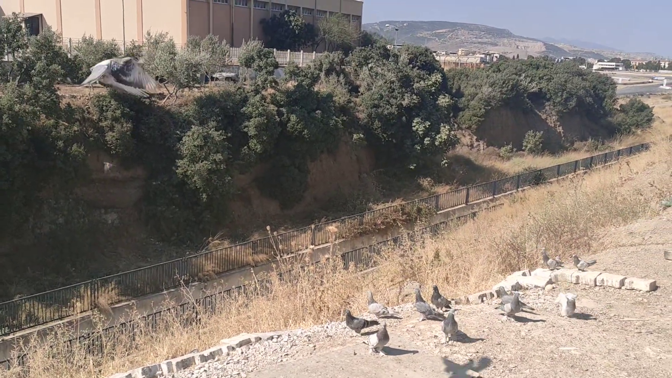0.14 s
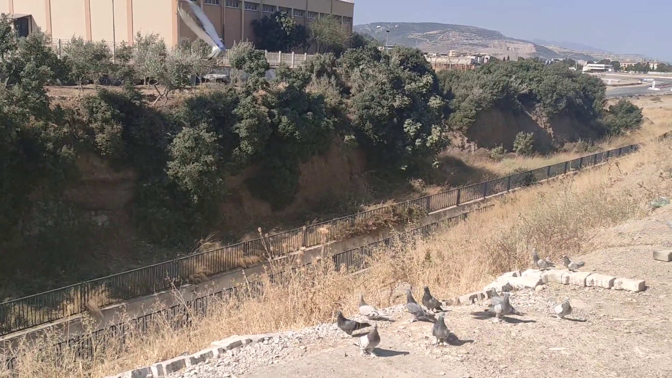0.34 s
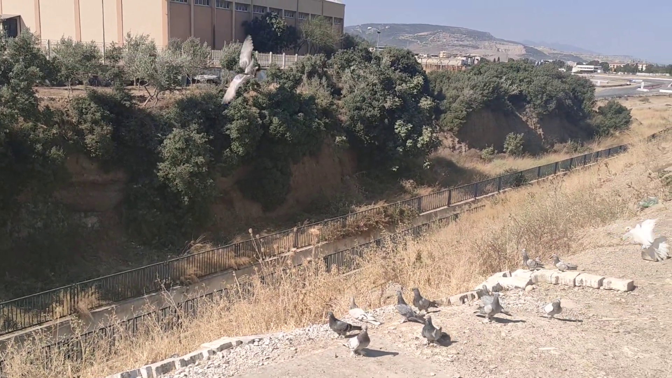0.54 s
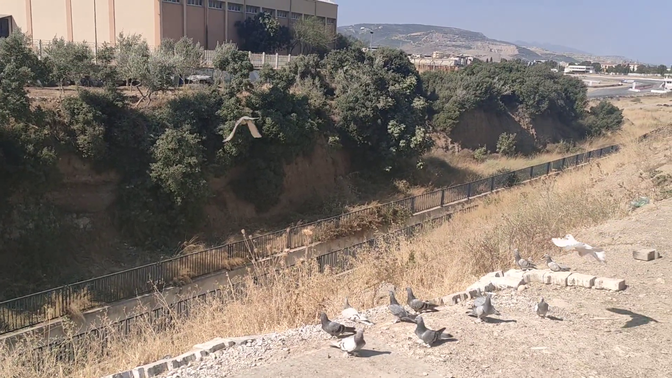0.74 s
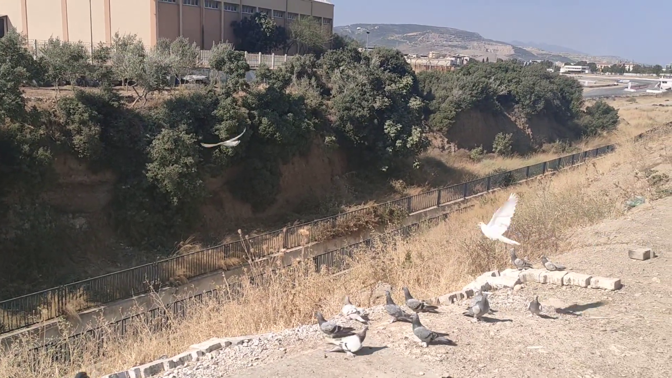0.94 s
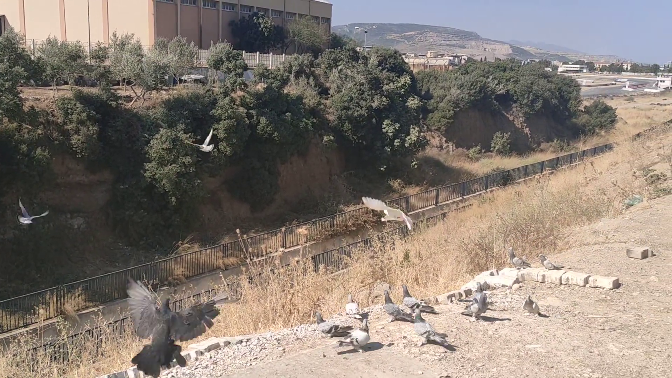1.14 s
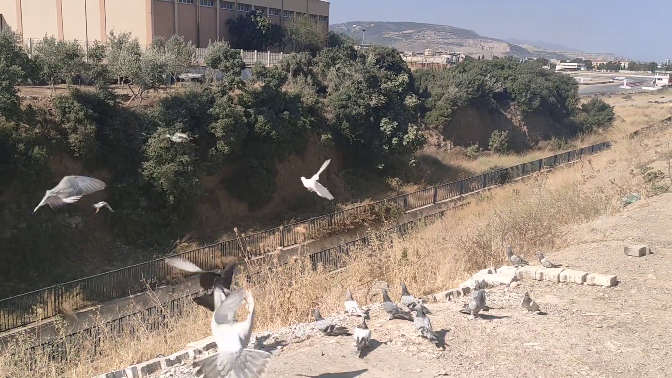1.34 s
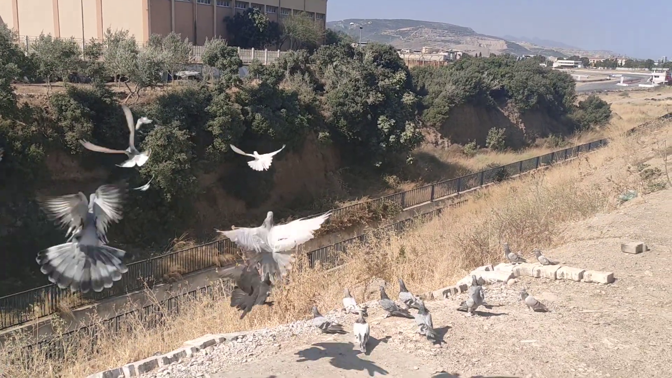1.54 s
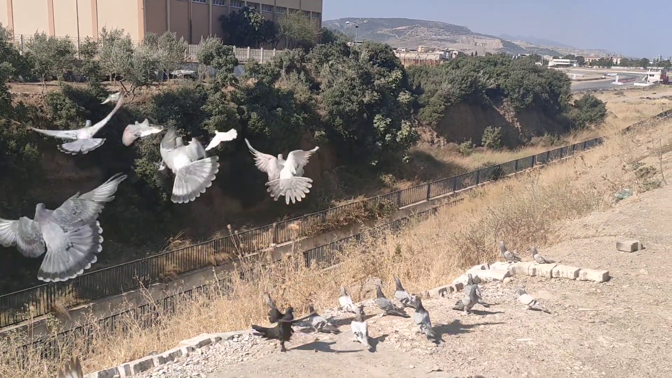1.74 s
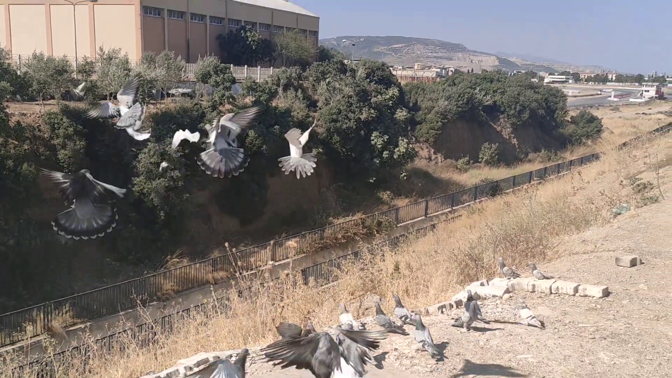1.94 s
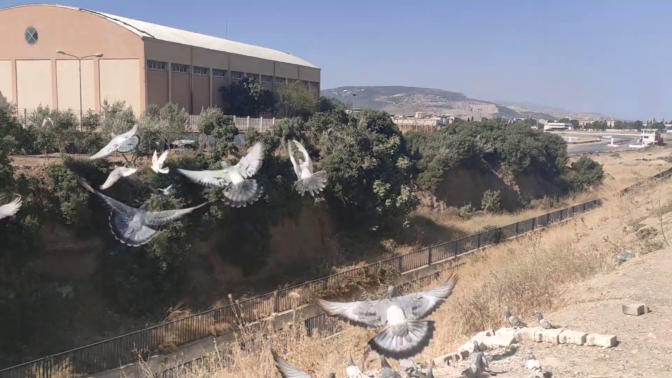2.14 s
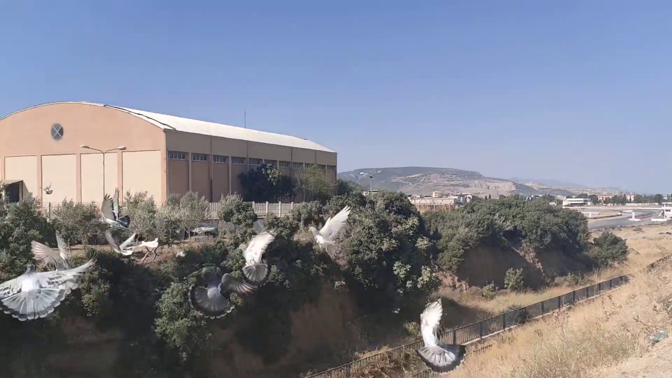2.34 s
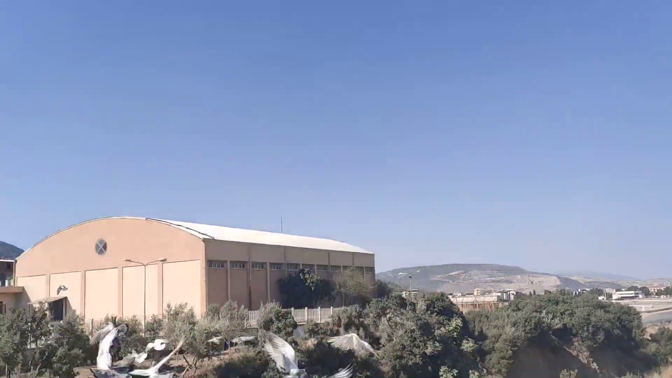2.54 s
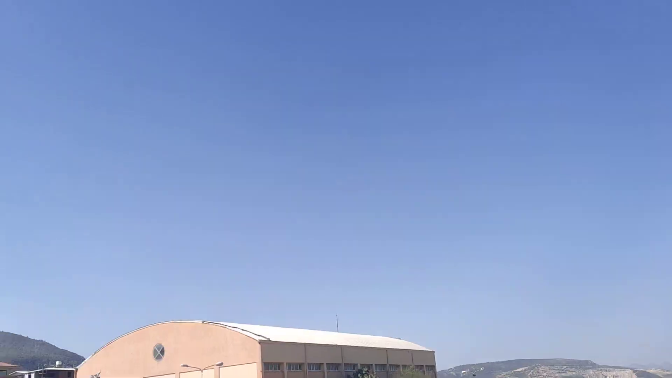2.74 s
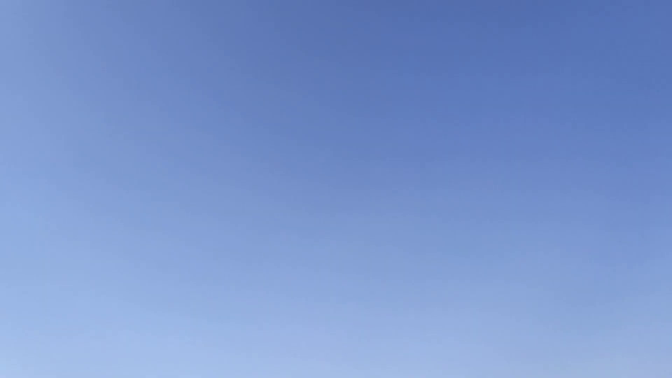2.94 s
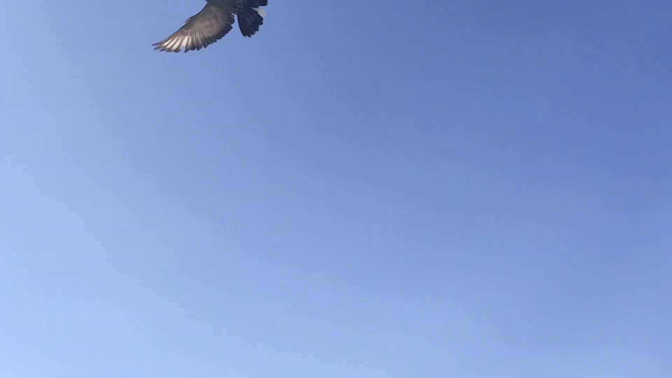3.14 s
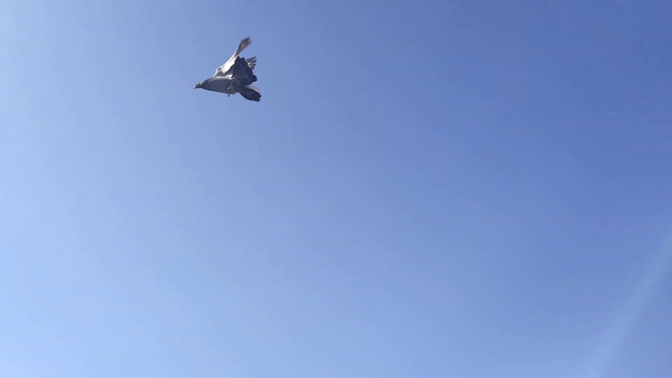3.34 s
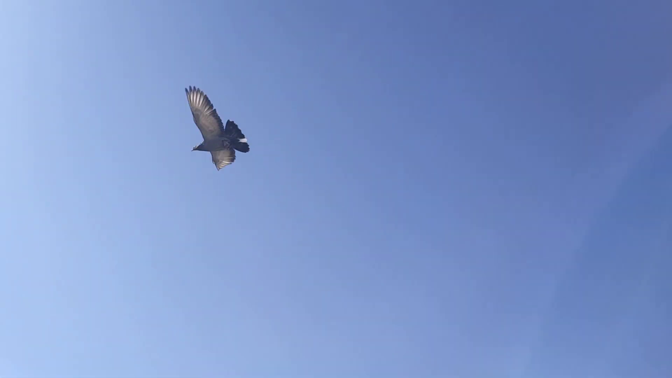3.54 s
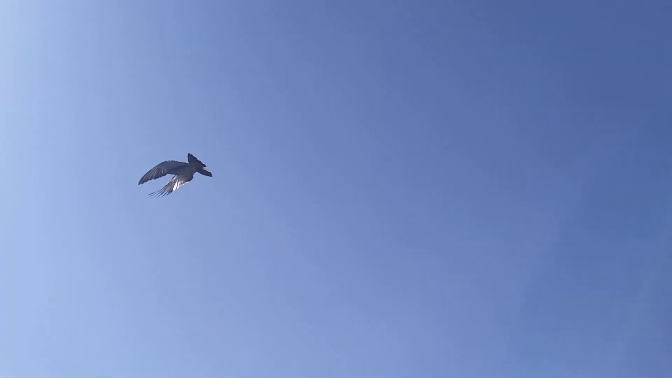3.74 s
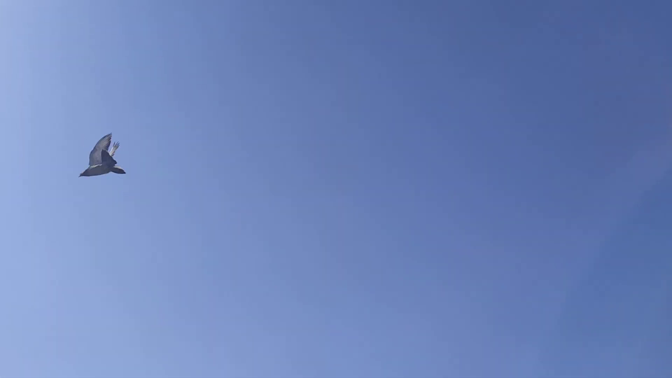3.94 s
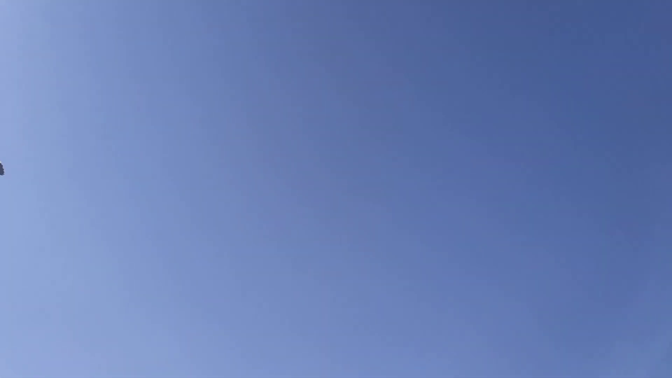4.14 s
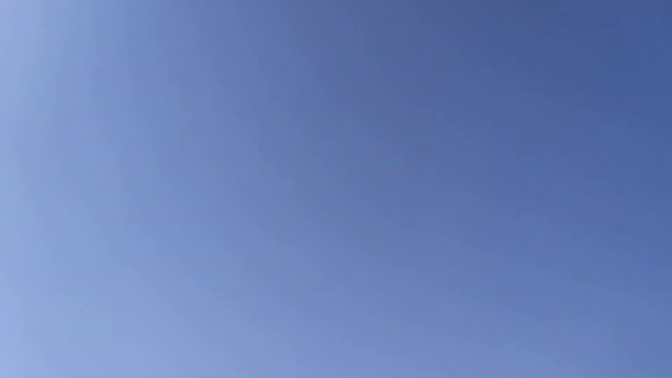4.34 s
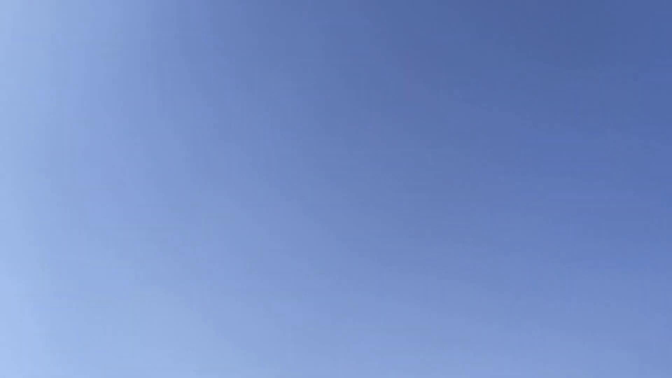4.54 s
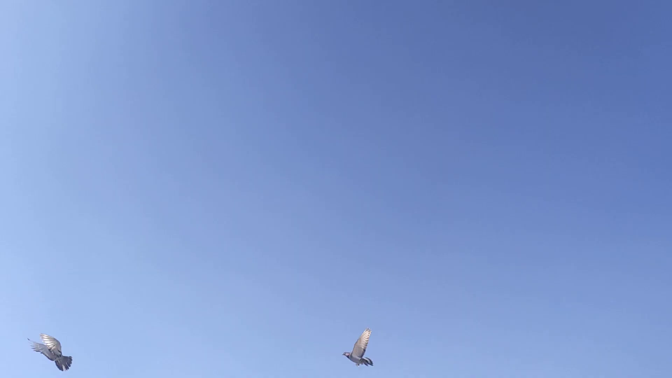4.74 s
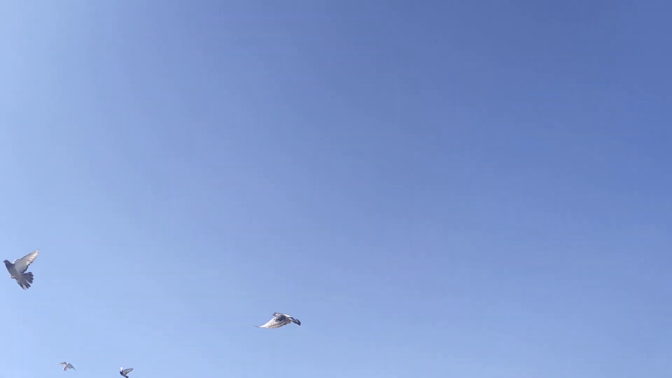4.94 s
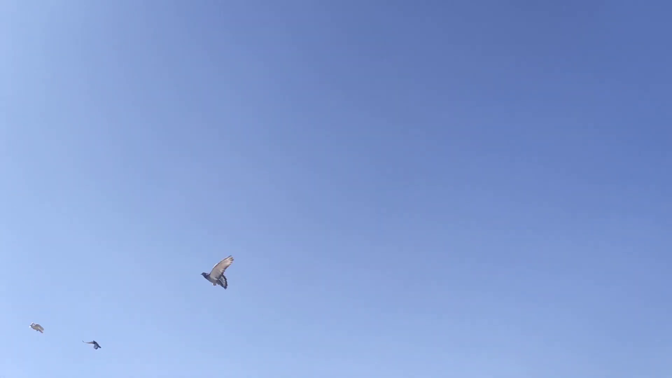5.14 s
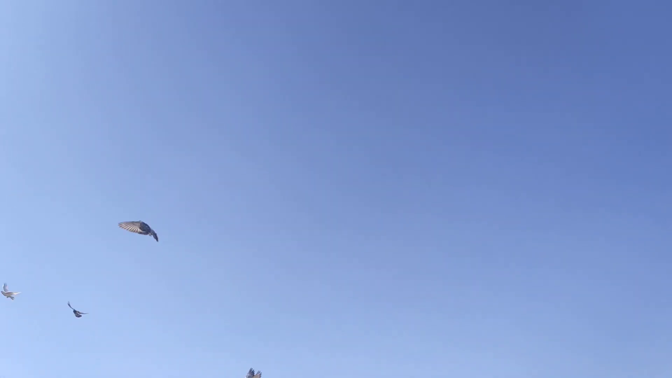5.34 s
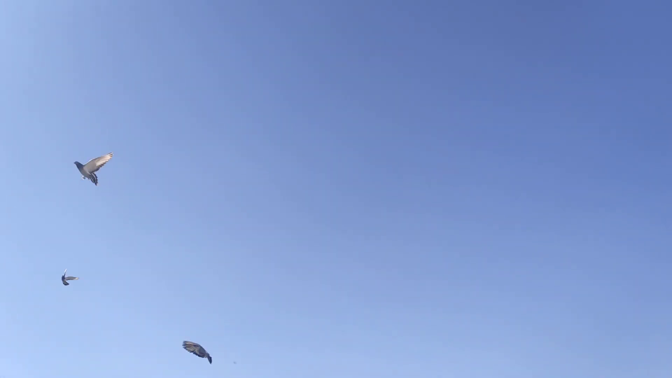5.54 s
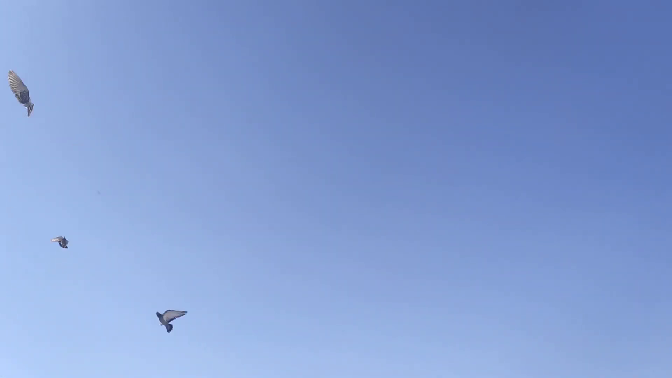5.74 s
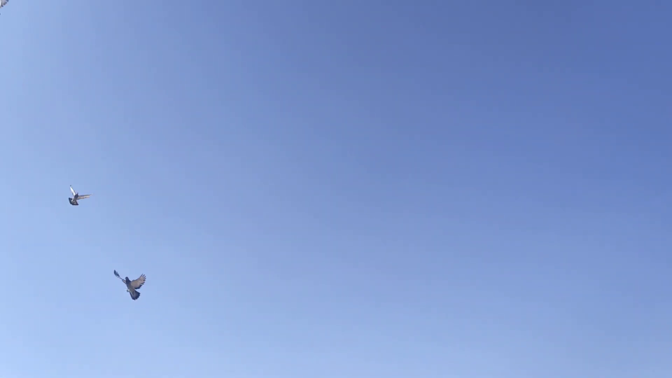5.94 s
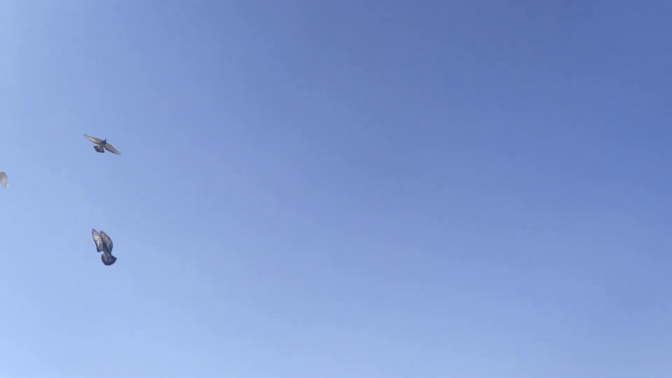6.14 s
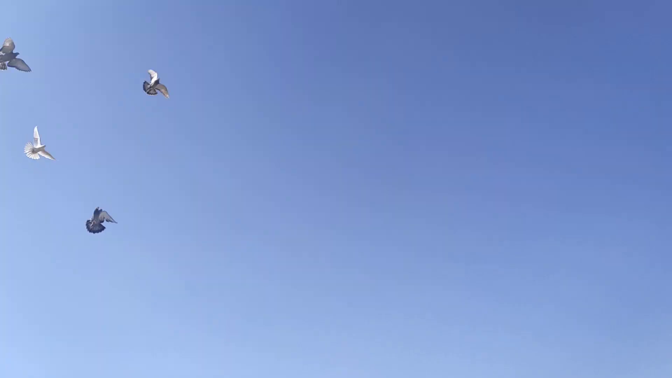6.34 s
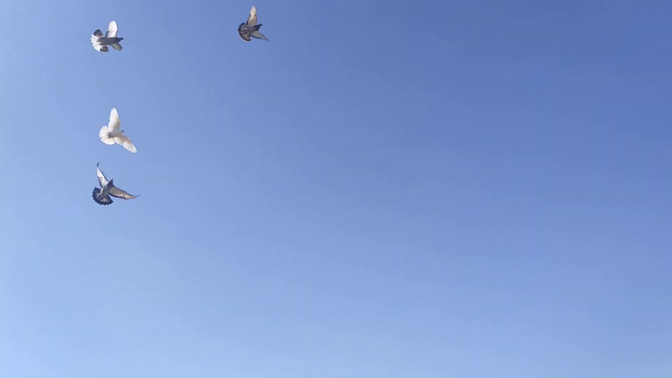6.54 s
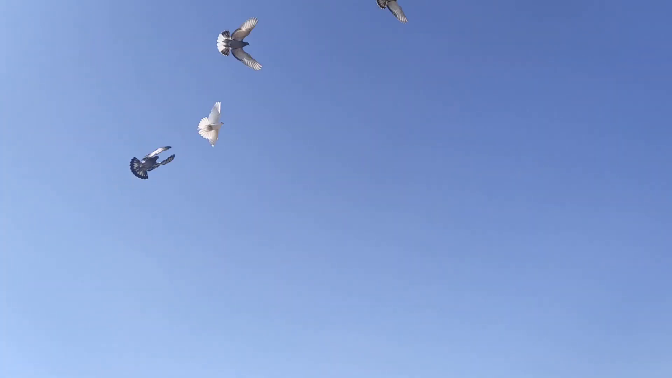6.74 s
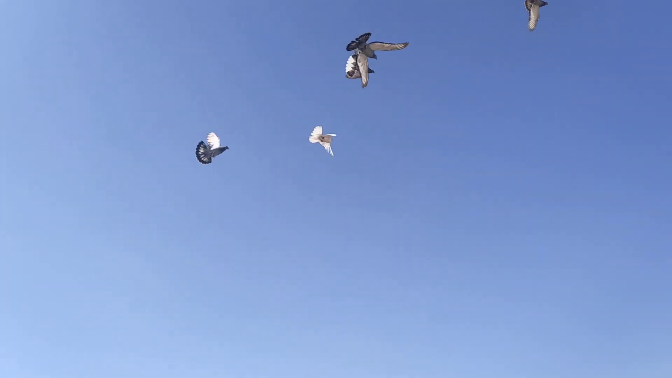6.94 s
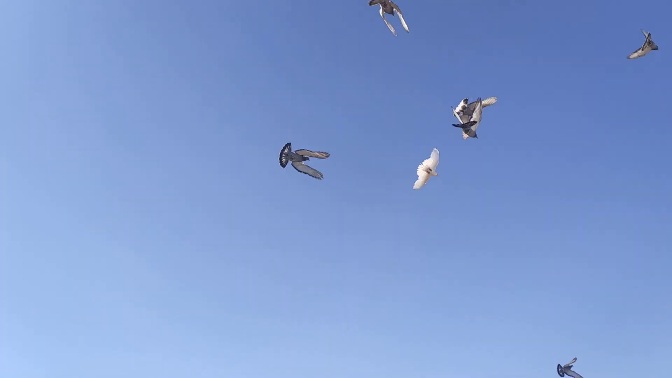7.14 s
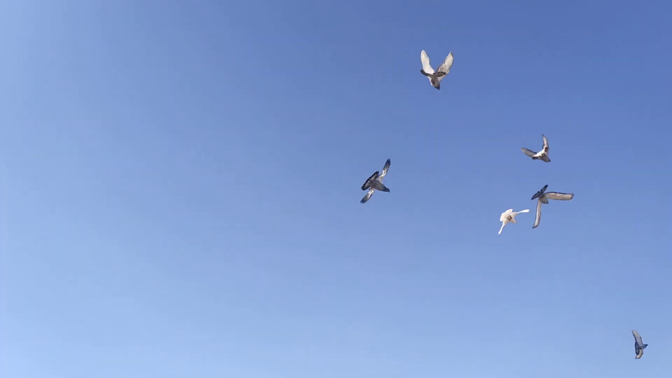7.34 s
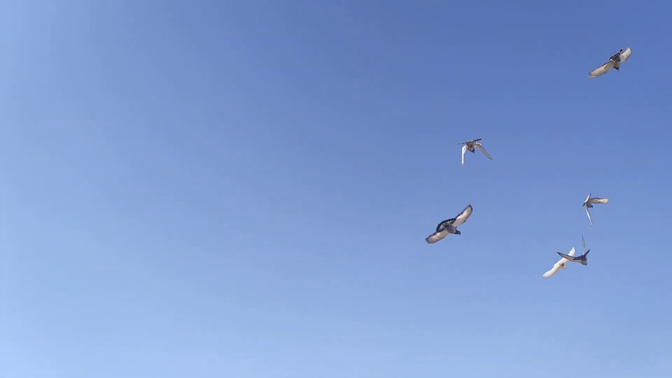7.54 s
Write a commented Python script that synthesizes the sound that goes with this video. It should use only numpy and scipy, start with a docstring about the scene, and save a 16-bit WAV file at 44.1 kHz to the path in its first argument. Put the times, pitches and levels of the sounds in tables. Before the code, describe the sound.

A flock of pigeons bursts into flight with dense clattering wing claps and feathery rustle, then thins to scattered flaps overhead above faint town hiss.

```python
"""Dry open ground, a few metres from a flock of pigeons that takes off and circles overhead.
Wing tips clap as shaped noise bursts with sharp cracks; noise of fluctuating level swishes and rustles.
Narrow noise bands make a wing whistle and its overtone; low noise puffs at the microphone, wings thump.
Far behind, the town is steady noise, with an idling engine and a thin buzz built from sines,
two wavering resonant tones, one dull filtered thud and a faint clink of decaying modes."""
import sys
import numpy as np
from scipy import signal
from scipy.fft import rfft, irfft, next_fast_len
from scipy.io import wavfile
from scipy.ndimage import map_coordinates

SR = 44100
rng = np.random.default_rng(int(sys.argv[2]) if len(sys.argv) > 2 else 0)


def file_out(sig):
    """Save sig as 16-bit WAV at sys.argv[1]."""
    # one column per channel
    cols = np.atleast_2d(sig).T
    # limit, then scale
    lim = np.clip(cols, -1, 1)
    pcm = np.round(lim * 32767).astype(np.int16)
    wavfile.write(sys.argv[1], SR, pcm)


N = 334278
TIME = np.arange(N) / SR

# Wing claps loud and faint, with some late ticks and one echo off the ground:
# start_s, snap_db (over 10 ms, before trim), t60_s (before each range's linger), hollow body_db re snap,
# side_db (left re right, in full on the snap), crack_share (of power, 0-1, before its reach)
WING_CLAPS = [(0.0304, -46, 0.013, -2, 6, .3), (0.2425, -32, 0.12, -4, 7, 0.23),
              (0.318, -39.5, 0.02, -22, 2, 0.5), (0.3726, -38.5, 0.036, -4, 7, 0),
              (0.4424, -31, 0.0076, -12.5, -5, 0), (0.548, -43, 0.014, 0, 3, .4),
              (0.5622, -27, 0.021, -4.5, 2.5, 0.6), (0.5792, -36, .01, -24, 7, 0.7),
              (.597, -47, 0.012, -16, 14, .4), (0.622, -37, 0.016, -21, 14, 0.5),
              (0.685, -24.5, 0.013, -9.5, 2.5, 0.27), (0.705, -33.5, 0.059, 3, -31, 0.04),
              (0.7165, -37.5, 0.026, 1, 11, 0.2), (0.751, -45, 0.018, -9, 2, 0),
              (0.7706, -24, 0.012, -8, 0, 0.13), (0.8044, -23, 0.013, -11, -4, 0),
              (0.834, -33, 0.011, -4, -1, 0.4), (0.876, -41, .018, -23, -16, 0.2),
              (0.9234, -29.5, 0.012, -6.5, -6, 0.25), (0.9471, -23.5, 0.017, -9.5, -6, 0.26),
              (1.013, -29, .008, -11, 17, .4), (1.015, -29, 0.021, -5.5, -14, 0),
              (1.0547, -37, 0.012, -12, 5, 0.3), (1.079, -25.5, 0.023, -8.5, -4, 0.05),
              (1.1359, -23.5, 0.035, -6, 0, 0.08), (1.1932, -31, 0.022, -0.5, 0, 0.15),
              (1.25, -25.5, 0.026, -5.5, 0.5, 0), (1.263, -30.5, 0.08, -10, 9, 0.3),
              (1.3028, -24.5, 0.017, -6, 3, 0.1), (1.328, -33, .035, -7, -1, 0.2),
              (1.346, -33, 0.018, -4, 0, 0.2), (1.371, -22, 0.019, -10.5, -1.5, .4),
              (1.4144, -27, 0.03, -4.5, 2, 0.45), (1.4628, -34, .013, -22, 5, 0.6),
              (1.499, -26.5, 0.025, -9, 0, 0.3), (1.508, -32.5, 0.025, -1, 2, 0),
              (1.5292, -26.5, 0.049, -0.5, -1, 0.1), (1.5364, -37, .016, -29, 1, 0),
              (1.5728, -22, 0.018, -4.5, 1, 0.3), (1.6146, -26.5, 0.11, 1.5, 3.5, 0.12),
              (1.648, -26.5, 0.034, -1, 1, 0.1), (1.6879, -26.5, 0.01, -4, -6, 0.6),
              (1.7293, -28, 0.05, -1, 1, 0.2), (1.7678, -23.5, 0.022, -10, -4, 0),
              (1.782, -28.5, 0.031, 5, 5, 0), (1.8055, -30, .015, -21, -8, 0.2),
              (1.838, -39, 0.02, 9, 0, 0.2), (1.8618, -30, 0.016, 0, 6, 0.06),
              (1.8697, -34, 0.01, -10, -14, 0.5), (1.893, -24, 0.052, -5, -1.5, 0),
              (1.952, -26, 0.0072, -4, 4, 0.44), (2.0092, -30.5, 0.026, -15, -3, 0),
              (2.0561, -26, 0.019, 1, 0, 0), (2.13, -32, 0.0082, -1.5, -2, 0.7),
              (2.134, -30, .022, -5, 1, 0), (2.164, -23, 0.032, -10, -2.5, 0.47),
              (2.231, -40, .03, 2, -6, 0), (2.2584, -30, 0.023, -11, -4, 0.1),
              (2.2747, -21.5, 0.012, -9.5, -1, 0.23), (2.2786, -34, 0.01, -13, -6, 0.5),
              (2.326, -44, 0.024, 4, -23, 0), (2.387, -27, 0.036, -6, -5, 0),
              (2.499, -35, 0.03, 0, -5, 0.1), (2.6213, -38.5, 0.02, -6, -14, 0.3),
              (2.695, -36.5, 0.024, -9, -14, 0.3), (2.7386, -35.5, 0.019, -7, -8, 0.1),
              (2.779, -35.5, 0.05, -11, -9, .05), (2.814, -42, 0.022, -6, -9, 0),
              (2.8268, -32, 0.025, -5, -1.5, 0), (2.91, -40.5, 0.031, -2.5, -9, 0),
              (2.9466, -31.5, 0.03, -3.5, 1.5, 0.03), (3.0164, -36, 0.014, -12, -3, 0.2),
              (3.0438, -32.5, 0.028, -9.5, -4, 0.4), (3.064, -33, 0.017, -9, -3, 0.2),
              (3.1747, -31, 0.04, -6, -7, 0.06), (3.181, -32, .022, -4.5, -2, 0.16),
              (3.24, -42, 0.027, -8, -8, 0), (3.3094, -31.5, 0.017, -6, 0, 0),
              (3.4453, -34, 0.047, -4, 0, 0.44), (3.509, -37.5, 0.14, -12, -3, 0.1),
              (3.622, -36, 0.18, -5.5, -4, 0.03), (3.7498, -34, 0.045, -5, 0, 0.07),
              (3.788, -46.5, .02, 4, 0, 0.4), (3.876, -34.5, 0.047, -10.5, -7, 0.15),
              (3.9143, -38.5, 0.018, -3.5, 3, 0.2), (4.008, -38.5, 0.016, -10, -6, .3),
              (4.28, -41.5, 0.021, -7, 3, .2), (4.4179, -37.5, 0.03, -4.5, -3, 0.2),
              (4.564, -31, 0.017, -7.5, 0, 0), (4.616, -35.5, 0.029, -8, 3, 0.5),
              (4.748, -41.5, 0.032, -5, 0, 0.16), (4.8452, -35.5, 0.027, -1, 6, 0),
              (4.9004, -42.5, 0.034, -2, 2, 0), (4.981, -40.5, 0.032, -3, 0, 0.3),
              (5.1158, -27.5, 0.015, -7, -19, 0.77), (5.1234, -31, 0.0052, -18, 22, 0),
              (5.314, -48, .012, -15, 0, 0.3), (5.4002, -42.5, .02, -3, -2, .3),
              (5.4608, -34.5, 0.085, -10, 0, 0.56), (5.5763, -41.5, 0.046, -4.5, -6, 0),
              (5.7075, -36.5, 0.0078, -12, 5, 0.1), (5.7123, -36.5, 0.011, -10, -7, 0.1),
              (5.811, -41, 0.022, -6, 13, 0.2), (6.125, -44.5, 0.041, -0.5, 6, 0),
              (6.1931, -35, 0.011, -9, 3, 0), (6.321, -39.5, 0.0055, -11, -1, 0.4),
              (6.365, -38.5, 0.06, -12, -2, .1), (6.557, -36.5, 0.42, -8, 4, 0),
              (6.746, -40, 0.088, -6, 3, 0.1), (6.864, -41, 0.05, -3, -1, 0.07),
              (6.979, -35.5, 0.056, -5.5, -1, 0.04), (7.0664, -30.5, 0.14, -10, -0.5, 0.02),
              (7.1765, -28.5, 0.037, -11.5, 4, 0.27), (7.2123, -30, 0.29, -4.5, 3, 0.3),
              (7.2875, -28, 0.14, -6, 1, 0.23), (7.29, -28, 0.016, -7.5, 0, 0.3),
              (7.41, -28.5, 0.11, -10, -0.5, 0.08), (7.4124, -33, .02, -2.5, 4, 0.3),
              (7.5424, -35.5, 0.12, -6.5, 0, 0.08)]
# How near and busy the flock is: time_s, level_db of its rush (a guide for the levels of each range)
FLOCK_LEVEL = [(0.0, -48.5), (0.22, -47.5), (0.3, -47), (0.52, -46.5), (0.64, -44), (1.08, -41.5),
               (1.46, -40.5), (1.73, -41), (1.92, -42.5), (2.43, -44), (2.89, -46.5), (3.3, -48),
               (3.7, -49.5), (4.03, -47), (4.42, -49.5), (4.58, -46), (4.73, -46), (4.82, -48), (5.66, -49),
               (6.3, -48.5), (6.86, -48), (7.23, -45), (7.58, -49)]
# The two microphone ports resonate differently: frequency_hz, left_re_right_db
MIC_PORTS = [(150, 0.5), (700, 0), (1200, -4), (1800, -6), (2800, -0.5), (3600, 5), (4400, -6.5),
             (5400, -7.5), (6500, -5.5), (7500, 7), (8600, 11), (10600, 9.5), (12300, 1.5), (15500, -2)]
# Low, middle and treble ranges of the wing sounds: low_hz, high_hz
WING_RANGES = [(20, 600), (600, 2500), (2500, 17000)]


def from_db(db):
    """Decibels to amplitude gain."""
    return 10 ** (np.asarray(db) / 20)


def rms_one(x):
    """Scale to unit power."""
    return x / np.sqrt(np.mean(x ** 2) + 1e-20)


def at_hz(points, hz):
    """Read a spectrum on a log-frequency axis."""
    f, value = np.transpose(points)
    return np.interp(np.log(hz + 1e-3), np.log(f), value)


def in_time(rows, t):
    """Read each column of a curve in time."""
    s, *columns = np.transpose(rows)
    return [np.interp(t, s, c) for c in columns]


def pan(db):
    """Left and right gains for a level difference, at constant power."""
    pair = from_db(np.array([[.5], [-.5]]) * db)
    return pair / np.sqrt(np.mean(pair ** 2, axis=0))


def add(out, x, s):
    """Mix a short sound in at a time in seconds."""
    i = int(round(s * SR))
    a, b = max(i, 0), min(i + x.shape[1], N)
    out[:, a:b] += x[:, a - i:b - i]


def drift(rate):
    """Random wander with spread 1: straight lines between random levels, `rate` of them per second."""
    knots = rng.standard_normal(4000)
    return rms_one(np.interp(TIME * rate, np.arange(len(knots)), knots))


def response(spectrum, edges, hz):
    """Gain of each microphone port for one range of a spectrum."""
    low, high = edges
    band = 1 / np.sqrt((1 + (low / (hz + 1)) ** 10) * (1 + (hz / high) ** 10))
    return band * from_db(at_hz(spectrum, hz)) * pan(at_hz(MIC_PORTS, hz))


def causal(gain):
    """Minimum-phase filter with these gains: it rings only after the blow."""
    cepstrum = irfft(np.log(gain + 1e-4))
    half = cepstrum.shape[-1] // 2
    cepstrum[:, 1:half] *= 2
    cepstrum[:, half + 1:] = 0
    return np.exp(rfft(cepstrum))


def diffuse(spectrum, edges, grain_db=0):
    """Stereo noise from all around, alike in the bass; random steps in level (grain) make it crackle."""
    # left-right likeness of diffuse sound: frequency_hz, likeness (-1 to 1)
    likeness = [(30, 1), (200, 0.9), (400, 0.76), (700, 0.36), (1300, -0.42), (2500, 0.12), (16000, -0.22)]
    size = next_fast_len(N)
    hz = np.fft.rfftfreq(size, 1 / SR)
    steps = np.repeat(rng.standard_normal(size), 32)[:size]
    mid, side = rfft(rng.standard_normal((2, size)) * from_db(grain_db * steps))
    alike = np.clip(at_hz(likeness, hz), -.99, .99)
    pair = np.sqrt(1 + alike) * mid + np.sqrt(1 - alike) * side * [[1], [-1]]
    return rms_one(irfft(pair * response(spectrum, edges, hz), size)[:, :N])


def hum():
    """Noise through narrow resonances gives wavering tones that come and go in the distance."""
    # thin tones: frequency_hz, width_hz, level_db
    thin_tones = [(2545, 22, -66), (4005, 35, -62)]
    fading_db, fades_per_s = 2.5, 13
    out = 0
    for hz, width_hz, db in thin_tones:
        r = np.exp(-np.pi * width_hz / SR)
        resonance = [1, -2 * r * np.cos(2 * np.pi * hz / SR), r * r]
        tones = signal.lfilter([1, 0, -1], resonance, rng.standard_normal((3, N)))
        # one part is common to both ears, a weaker one is separate in each
        pair = tones[0] + .5 * tones[1:]
        out = out + from_db(db) * rms_one(pair * from_db(fading_db * drift(fades_per_s)))
    return out * pan(-0.5)


def far_buzz():
    """Only the high overtones of a far buzz stand out of the hiss; each fades on its own."""
    # level of the overtones: frequency_hz, level_db
    overtones = [(4400, -73), (5400, -72), (5790, -63), (6000, -69), (6200, -66), (6450, -77)]
    pulse_hz, waver_hz, fading_db = 125.8, .15, 2
    cycles = np.cumsum(pulse_hz + waver_hz * drift(8)) / SR
    first, last = int(overtones[0][0] / pulse_hz), int(overtones[-1][0] / pulse_hz)
    out = 0
    for k in range(first, last + 1):
        hz = k * pulse_hz
        level = from_db(at_hz(overtones, hz) + fading_db * drift(13))
        tone = np.sin(2 * np.pi * (k * cycles + rng.random((2, 1))))
        out = out + level * pan(at_hz(MIC_PORTS, hz)) * tone
    return np.sqrt(2) * out


def engine():
    """A far engine idles: a few whole multiples of its cycle rate get through and throb together."""
    # engine orders: multiple (of the cycle rate), level_db
    engine_orders = [(13, -72), (16, -65.5), (17, -61.5), (18, -64.5), (25, -74)]
    cycle_hz, waver_hz = 14.76, 0.022
    cycles = np.cumsum(cycle_hz + waver_hz * drift(1.426)) / SR
    orders = sum(from_db(db) * np.sin(2 * np.pi * round(order) * cycles) for order, db in engine_orders)
    return np.sqrt(2) * orders * pan(-2.7)


def far_thud(size=4096):
    """Something heavy lands far off: a dull blow that bounces, then a rumble from the walls around."""
    # the blow and its bounces: start_s, peak_db
    thud_hits = [(4.198, -30), (4.208, -30.5), (4.217, -35)]
    # spectrum of the blow and rumble: frequency_hz, density_db (per Hz)
    thud_spectrum = [(100, -7), (135, -1), (220, -2), (340, 1), (460, 3.5), (560, -16), (750, -11),
                     (1200, -36)]
    range_hz = (120, 1200)
    rumble_db, rumble_t60_s, rise_s = -39.5, 0.52, 0.0091
    out = np.zeros((2, N))
    blow = irfft(causal(response(thud_spectrum, range_hz, np.fft.rfftfreq(size, 1 / SR))))
    for s, db in thud_hits:
        add(out, from_db(db) * blow / np.abs(blow).max(), s)
    t = np.maximum(TIME - thud_hits[0][0], 0)
    rumble = from_db(-60 * t / rumble_t60_s) * (1 - np.exp(-t / rise_s))
    return out + from_db(rumble_db) * rumble * diffuse(thud_spectrum, range_hz)


def far_clink():
    """A small hard thing is knocked far off; its modes ring briefly."""
    # ringing modes: frequency_hz, level_db (re the clink's level), t60_s
    clink_modes = [(540, 4.5, 0.11), (1067, -2, .1), (2870, -2, 0.14), (3400, -5, .08), (3700, -11, .08)]
    start_s, level_db, rise_s = 4.70, -43.5, 0.0014
    out, t = np.zeros((2, N)), np.arange(SR) / SR
    ringing = 0
    for hz, db, t60 in clink_modes:
        ringing = ringing + from_db(db - 60 * t / t60) * np.sin(2 * np.pi * (hz * t + rng.random()))
    add(out, from_db(level_db) * ringing * (1 - np.exp(-t / rise_s)) * pan(0), start_s)
    return out


def downstrokes():
    """Power of the air swept by the wings just after each listed clap."""
    delay_s, width_s = 0.048, 0.019
    power, t = np.zeros((1, N)), np.arange(SR // 4) / SR
    sweep = np.exp(-.5 * ((t - delay_s) / width_s) ** 2)
    for s, snap_db, *_ in WING_CLAPS:
        add(power, from_db(snap_db) ** 2 * sweep[None], s)
    return power[0]


def town_and_wing_rush():
    """The steady wash of the town; whatever rises above it is air and small flicks of many feathers."""
    # spectra of the town and of the feathers: frequency_hz, density_db (per Hz)
    town_spectrum = [(30, -15), (70, -12), (120, -7.5), (250, -0.5), (400, -2), (1100, -3.5), (1600, -0.5),
                     (2500, -1), (2900, -18), (3400, -11), (4400, -4.5), (5400, 5.5), (6100, 9),
                     (6700, -14.5), (8400, -6.5), (10500, -16.5), (15500, -32)]
    feather_spectrum = [(30, -20), (70, -13.5), (120, -8.5), (250, 1.5), (400, -2.5), (750, -1),
                        (1100, -3.5), (2000, -3.5), (3200, -11), (4200, -7), (5700, -2.5), (6900, -14.5),
                        (8400, -5), (10000, -19.5), (12000, -22), (15500, -18)]
    # triples are for the low whoosh, the swish and the feather rustle
    town_db = (-57.0, -55, -49.5)
    rush_ref_db, rush_db, db_per_swell_db = -45, (-51, -46, -43.5), (1.57, 1.62, 1)
    stroke_db = (-34, -26, -28.5)  # downstroke swish re snap
    surge_db, surges_per_s = (2, 1.3, 1.6), 41
    flicks_per_s, flick_s, grain_db = 130, (.008, .005, .0025), (0, 2.0, 3.0)
    smooth_flow = (1.1, .6, .45)  # even airflow under the flicks
    blend_per_db = 3  # dB of unevenness lost per dB that the rush falls below its reference

    flicks = (rng.random(N) < flicks_per_s / SR) + 1e-18
    strokes = downstrokes()
    swell_db = in_time(FLOCK_LEVEL, TIME)[0] - rush_ref_db
    # a far flock blends into an even wash
    near = np.clip(from_db(blend_per_db * swell_db), 0, 1)
    # the rush surges as the strokes of many wings overlap
    surge = drift(surges_per_s) * near
    out = 0
    for k, edges in enumerate(WING_RANGES):
        # each flick has its own power in each range; it jumps and dies, soonest in the treble
        decay = np.exp(-1 / (flick_s[k] * SR))
        flutter = signal.lfilter([1], [1, -decay], flicks * rng.random(N) ** 2)
        flutter_gain = rms_one(np.sqrt(smooth_flow[k] ** 2 + flutter))
        total = from_db(rush_db[k] + db_per_swell_db[k] * swell_db)
        town = from_db(town_db[k])
        rush_power = np.maximum(total ** 2 - town ** 2, 0)
        wings = np.sqrt(rush_power + from_db(stroke_db[k]) ** 2 * strokes)
        wings = wings * (1 - near + near * flutter_gain)
        surging = from_db(surge_db[k] * surge)
        out = out + town * diffuse(town_spectrum, edges)
        out = out + surging * wings * diffuse(feather_spectrum, edges, grain_db[k])
    return out


def uneven(x, size=1024):
    """Narrow bands of a hiss swell and fade on their own; unevenness grows from the bass up to 2 kHz."""
    patch_db, patch_hz, patch_s = 3.2, 170, .07
    hz, s, bands = signal.stft(x, SR, nperseg=size)
    knots = rng.standard_normal((int(SR / patch_hz), int(N / SR / patch_s) + 3))
    depth_db = patch_db * np.clip(hz / 2000, 0, 1)[:, None]
    grid = np.meshgrid(hz / patch_hz, s / patch_s, indexing="ij")
    gain = from_db(depth_db * map_coordinates(knots, grid, order=3))
    gain = gain / np.sqrt(np.mean(gain ** 2, axis=1, keepdims=True))
    return signal.istft(bands * gain, SR, nperseg=size)[1][:, :N]


def wing_whistle(track):
    """A wing sings in the airflow: a breathy band of noise that follows one pitch track."""
    wander_per_s = 260
    hz, db = in_time(track, TIME)
    phase = 2 * np.pi * np.cumsum(hz) / SR
    breathy = []
    for ear in range(2):
        breathy.append(drift(wander_per_s) * np.cos(phase) + drift(wander_per_s) * np.sin(phase))
    return from_db(db) * rms_one(np.array(breathy))


def downwash():
    """Each near stroke pushes a soft, deep puff of air at the microphone."""
    # downwash of the nearest wings: centre_s, level_db (before the trim)
    air_puffs = [(.43, -54), (.62, -54), (1.14, -57), (1.41, -48), (1.54, -55), (1.66, -47), (1.78, -44),
                 (2.06, -55), (2.17, -55), (2.26, -55), (2.74, -52), (2.95, -56), (4.56, -54), (7.21, -50)]
    width_s, top_hz, trim_db = 0.017, 115, -3.5
    swell = sum(from_db(db) * np.exp(-.5 * ((TIME - s) / width_s) ** 2) for s, db in air_puffs)
    return from_db(trim_db) * swell * diffuse([(30, -1.2), (120, 0.19)], (26, top_hz))


def whumps(size=2048):
    """A cupped wing traps air and lets it go in a few low cycles."""
    # hollow thumps under a near wing: centre_s, level_db (over 10 ms), pitch_hz (band centre)
    trapped_air = [(0.435, -38.5, 298), (0.564, -39.5, 314), (0.646, -44, 230), (1.025, -45, 340),
                   (1.136, -34, 320), (1.346, -37.5, 400), (1.536, -35, 300), (1.575, -41, 340),
                   (1.664, -38, 340), (1.785, -34, 280), (1.896, -36, 251), (1.955, -33, 236),
                   (2.06, -45, 300), (2.168, -39, 260), (2.265, -37, 368), (2.375, -46, 310),
                   (2.5, -44.5, 280), (2.95, -44, 400), (3.178, -52, 320), (3.451, -49, 300),
                   (4.57, -44.5, 260), (6.678, -47, 363), (7.178, -48, 260), (7.225, -43.5, 270)]
    width_s, octaves = 0.0045, 0.52
    out, hz = np.zeros((2, N)), np.fft.rfftfreq(size, 1 / SR)
    t = (np.arange(size) - size / 2) / SR
    for s, db, centre_hz in trapped_air:
        push = rng.standard_normal(size) * np.exp(-.5 * (t / width_s) ** 2)
        hollow = np.exp(-.5 * (np.log2((hz + 1) / centre_hz) / octaves) ** 2)
        # scaled so that its energy equals 10 ms at the listed level
        thump = rms_one(irfft(rfft(push) * hollow)) * np.sqrt(.01 * SR / size)
        add(out, from_db(db) * thump * pan(0), s + t[0])
    return out


def other_birds(count=2):
    """Claps of the rest of the flock, in runs of nearly even wing beats, each bird at its own rate."""
    beats_per_s, rate_spread, beat_jitter = 11, 0.097, 0.055
    start_s, re_rush_db, spread_db = .55, -3, 2
    typical_t60_s, body_db, side_spread_db, crack_share = 0.01, -6.5, 5.5, .4
    rows = []
    for bird in range(count):
        period_s = np.exp(rate_spread * rng.standard_normal()) / beats_per_s
        s = start_s + period_s * rng.random()
        for late, strong, long, side in rng.standard_normal((90, 4)):
            s += period_s * np.exp(beat_jitter * late)
            if s < N / SR:
                db = in_time(FLOCK_LEVEL, s)[0] + re_rush_db + spread_db * strong
                t60_s = typical_t60_s * np.exp(.5 * long)
                rows.append((s, db, t60_s, body_db, side_spread_db * side, crack_share))
    return rows


def wing_claps(size=4096):
    """The wings meet with a crack, then the quills rattle out; a glancing stroke brushes in more slowly."""
    # spectrum of a clap: frequency_hz, density_db (per Hz)
    clap_spectrum = [(100, -7.5), (250, -4), (400, 3), (800, -0.5), (2000, -8), (3200, -4.5), (4000, -1.5),
                     (5100, 4), (5800, 3.5), (6800, -6), (8400, 1), (10000, -9.5), (12000, -16.5),
                     (15500, -14.5)]
    # bearing of the birds: time_s, left_lead_ms
    bird_bearing = [(0, 0.43), (1.4, 0.41), (1.6, 0.33), (2.2, 0.41), (2.95, 0.057), (3.3, 0.087),
                    (3.75, -0.385), (4.5, 0.43), (7.5, 0.44)]
    # echo off the ground: time_s, delay_ms
    ground_echo = [(0.5, 2.7), (2.3, 3.54), (2.95, 10.2), (3.45, 11), (5.1, 6.3), (5.7, 5.9), (7.5, 3.8)]
    # tone as the birds turn: time_s, brightness_db (snap, per octave, before spread),
    # cup_hz (pitch of the air cupped between the wings, before spread)
    clap_tone = [(0, 0, 1310), (.7, 2, 1620), (1.15, 0, 1480), (1.55, 2.5, 1720), (2.3, 0.5, 1360),
                 (2.95, 2, 1240), (3.25, -3.5, 1260), (3.75, -0.5, 1800), (4.56, -2, 1360),
                 (4.85, -0.5, 1600), (5.12, 4.5, 990), (5.46, -0.5, 1340), (6.25, -8.5, 1470),
                 (6.95, 1.5, 1110), (7.29, -2, 1860)]
    # triples are for the (thump, body, snap)
    scatter, linger, crack_reach, trim_db = (.12, .45, 1.0), (1.2, .85, .7), (.3, .8, 1), 0.1
    thump_re_snap_db, thump_db_per_body_db = -19, 0.3
    cup_db, cup_octaves, cup_spread_octaves, bright_spread_db = 14.0, 0.53, 0.2, 2
    ripple_db, ripple_hz = 2.5, 450
    bounce, bounce_s, ground_db = 0.39, (.0007, .0018), -11.0
    quill_spread_db, brush_db, brush_share = 5.5, -11, 0.1
    rattle_shape = 1.4  # the rattle holds, then stops; 1 would be a plain exponential decay
    lead_s = .008  # room for the brush ahead of the clap

    out = np.zeros((2, N))
    t, hz = np.arange(size) / SR - lead_s, np.fft.rfftfreq(size, 1 / SR)
    after, octave = np.maximum(t, 0), np.log2(hz + 1)
    click = np.exp(-2j * np.pi * hz * lead_s)
    ranges = [(100, 600)] + list(WING_RANGES[1:])
    thump, body, snap = [response(clap_spectrum, edges, hz) for edges in ranges]
    for s, snap_db, t60, body_db, side_db, crack in list(WING_CLAPS) + other_birds():
        crack = np.clip(crack, 0, 1)
        bright_db, cup_hz = in_time(clap_tone, s)
        cup_hz = cup_hz * 2 ** (cup_spread_octaves * rng.standard_normal())
        bright_db = bright_db + bright_spread_db * rng.standard_normal()
        thump_db = thump_re_snap_db + thump_db_per_body_db * body_db
        cup_distance = (octave - np.log2(cup_hz)) / cup_octaves
        hollow = from_db(cup_db * np.exp(-.5 * cup_distance ** 2))
        # the treble tilts about 6500 Hz, by one octave's worth at most
        tilt = from_db(bright_db * np.clip(octave - np.log2(6500), -1, 1))
        # the spread feathers ring at slightly different pitches on every beat
        ripple = from_db(ripple_db * np.interp(hz / ripple_hz, np.arange(99), rng.standard_normal(99)))

        lead_ear_s = in_time(bird_bearing, s)[0] / 1000
        ground_s = in_time(ground_echo, s)[0] / 1000
        arrival = np.exp(1j * np.pi * hz * lead_ear_s * np.array([[1], [-1]]))
        # a close bounce combs every stroke differently; the ground answers later
        arrival = arrival * (1 + bounce * np.exp(-2j * np.pi * hz * rng.uniform(*bounce_s)))
        ground = 1 + from_db(ground_db) * np.exp(-2j * np.pi * hz * ground_s)

        # the quills strike as separate ticks of very unequal strength
        quills = from_db(quill_spread_db * np.repeat(rng.standard_normal(size // 16), 16))
        brush_rise = np.exp(np.minimum(t, 0) / (brush_share * t60))
        brush = from_db(brush_db) * (1 - crack) ** 4 * brush_rise
        layers = [(thump, thump_db), (body * hollow, body_db), (snap * tilt * ripple, 0)]
        for k, (colour, rel_db) in enumerate(layers):
            range_t60_s = max(t60 * linger[k], 1e-3)
            dying = from_db(-60 * (after / range_t60_s) ** rattle_shape)
            envelope = quills * np.where(t < 0, brush, dying)
            rattle = rfft(rms_one(rng.standard_normal((3, size)) * envelope)) / np.sqrt(size)
            # stony ground scatters a different rattle to each port
            rattle = (rattle[0] * arrival + rattle[1:] * scatter[k]) / np.hypot(1, scatter[k])
            # the crack is one sharp pressure pulse
            share = crack * crack_reach[k]
            sound = (np.sqrt(1 - share) * rattle + np.sqrt(share) * click * arrival) * ground
            # scaled so that its energy equals 10 ms at the set level
            beat = rms_one(irfft(sound * causal(colour))) * np.sqrt(.01 * SR / size)
            # the thump stays central, the body moves half as far as the snap
            add(out, beat * from_db(snap_db + rel_db + trim_db) * pan(side_db * k / 2), s - lead_s)
    return out


def surroundings(x):
    """Bank, trees and walls return a thin, dull tail; the close ports share its bass."""
    wet_db, t60_s, gap_s, dull_hz, apart_hz = -23, 0.077, .006, 5000, 900
    t = np.arange(SR // 2) / SR
    mid, side = rng.standard_normal((2, len(t))) * from_db(-60 * t / t60_s) * (t > gap_s)
    side = signal.sosfilt(signal.butter(1, apart_hz, "high", fs=SR, output="sos"), side)
    dulling = signal.butter(1, dull_hz, fs=SR, output="sos")
    tail = signal.sosfilt(dulling, [mid + side, mid - side])
    return from_db(wet_db) * signal.fftconvolve(x, rms_one(tail) / np.sqrt(len(t)), axes=1)[:, :N]


def scene():
    """The town behind, the flock in front; claps and clink also sound in the surroundings."""
    # a bird's wing whistle and its overtone near twice the pitch, a track each: time_s, pitch_hz, level_db
    whistle_tracks = [
        [(2.4, 2115, -63), (2.75, 2073, -51), (3.0, 2015, -58), (3.25, 2030, -57), (3.45, 2080, -51),
         (3.8, 2390, -66), (4.3, 2420, -65.5)],
        [(3.0, 3910, -73), (3.2, 3990, -48.5), (3.38, 3960, -51), (3.6, 3950, -60.5)],
    ]
    far = hum() + far_buzz() + engine() + far_thud()
    air = uneven(town_and_wing_rush()) + downwash() + whumps()
    air = air + sum(wing_whistle(track) for track in whistle_tracks)
    sharp = far_clink() + wing_claps()
    return far + air + sharp + surroundings(sharp)


def record(dry):
    """The top is cut steeply above 15.9 kHz."""
    return signal.sosfilt(signal.ellip(10, .1, 80, 15900, fs=SR, output="sos"), dry)


dry = scene()
out = record(dry)
file_out(out)
```